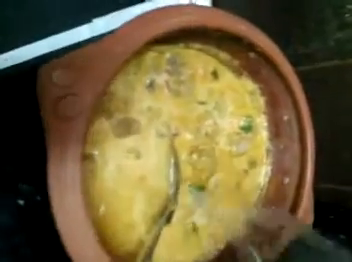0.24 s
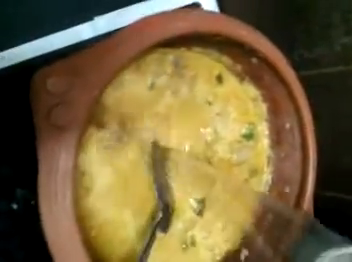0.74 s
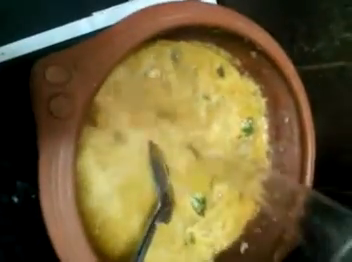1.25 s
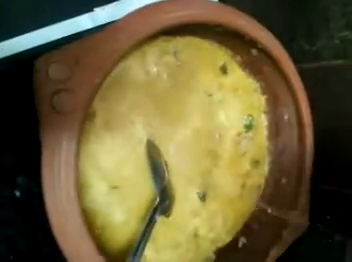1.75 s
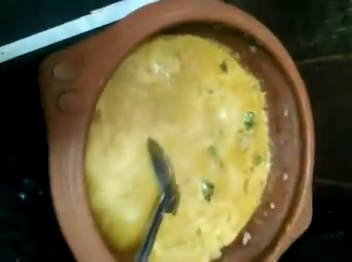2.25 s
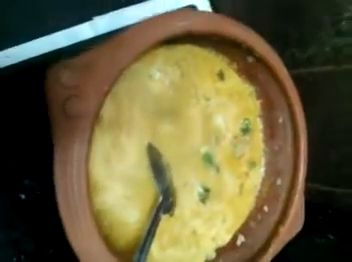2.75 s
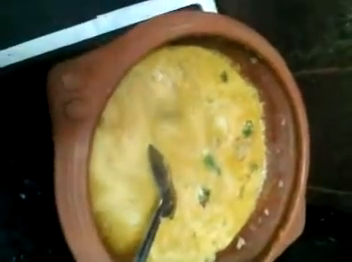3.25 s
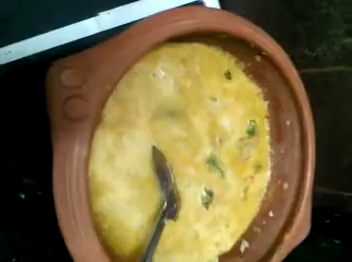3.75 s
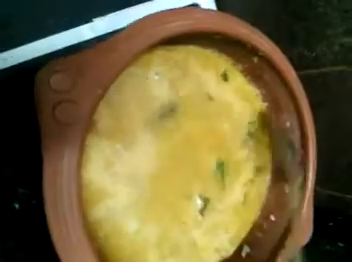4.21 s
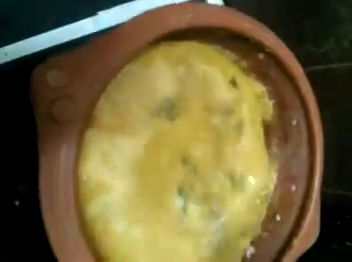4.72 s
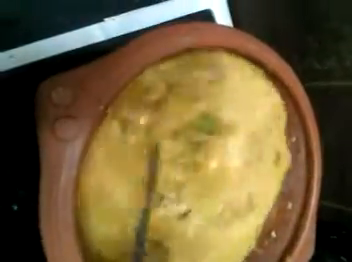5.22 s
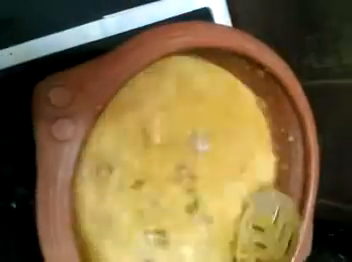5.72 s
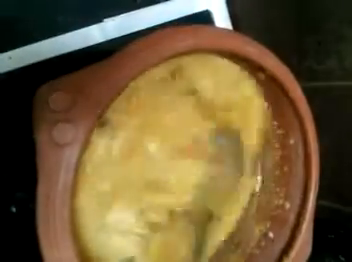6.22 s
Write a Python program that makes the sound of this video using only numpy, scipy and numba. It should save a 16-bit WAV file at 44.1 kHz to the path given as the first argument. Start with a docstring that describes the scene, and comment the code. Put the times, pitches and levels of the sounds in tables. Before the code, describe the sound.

Close crisp pouring with plinking drops fades to faint hiss, one sharp knock rings out, and gritty spoon strokes slosh round an earthenware pot.

```python
"""Pouring and stirring in a clay pot

Water is poured from a jug into a clay pot of curry, close to a phone: clouds of damped sines are the bubbles.
The jug is set down hard, ringing as a set of modes in a rattle of noise. Then a steel spoon scrapes round
the pot in grains of grit, and sauce slops and gurgles after it through wandering resonances. Decaying noise
gives the brief ring of a small hard kitchen; a stove hisses faintly, and metal ticks now and then."""
import sys
import numpy as np
from scipy import signal
from scipy.fft import rfft, irfft, next_fast_len
from scipy.io import wavfile
from scipy.ndimage import uniform_filter1d
from numba import njit

SR = 44100
rng = np.random.default_rng(int(sys.argv[2]) if len(sys.argv) > 2 else 0)


def wrap_up_sound(samples):
    """Save the sound to the file named by the first command line argument, as 16-bit audio."""
    columns = np.atleast_2d(samples).T
    # keep every value between -1 and 1, then stretch to whole-number steps
    tamed = np.clip(columns, -1, 1)
    steps = np.round(tamed * 32767).astype(np.int16)
    wavfile.write(sys.argv[1], SR, steps)


N = 285359
T = np.arange(N) / SR  # time in seconds

# The stream. Each row: time in seconds, spray level in dB, big bubbles in dB relative to the spray.
STREAM = [(0.485, -69, -18), (0.5, -49.5, -28), (0.56, -38, -14.5), (0.63, -47.5, -28), (0.7, -44.5, -25),
          (0.88, -45.5, -17), (1.05, -57, -22), (1.18, -57.5, -10.5), (1.22, -54, -32), (1.32, -57.5, -18),
          (1.37, -48, -23), (1.44, -51.5, -9.5), (1.56, -48, -20.5), (1.7, -58, -17), (1.81, -45, -21),
          (1.96, -56.5, -4.5), (2.05, -95, 0), (2.16, -61, -15), (2.4, -84, -7)]
# Spectrum of the poured water. Each row: frequency in Hz, gain in dB.
WATER_SPECTRUM = [(250, -43), (400, -57), (610, -21.5), (820, -16), (1190, -9), (2350, 3.5), (3020, -1.5),
                  (5270, 5.5), (7500, -10), (12000, 4)]
# Pitches the pot favours under the stream. Each row: frequency in Hz, width in Hz, level in dB re water.
STREAM_RESONANCES = [(540, 66, -18.5), (2075, 110, -17), (2630, 120, -18)]
MIDDLE_DB = -4  # middle-sized bubbles relative to the spray

# Spoon strokes. Each row: start in seconds, build-up in seconds, length in seconds, grit level in dB,
# gain in dB of each lower range over the one above, change of that gain in dB per second along the stroke.
SPOON_STROKES = [(4.49, 0.0053, 0.0088, -44.5, -7, 0.1), (4.555, 0.072, 0.37, -34, -5.5, 10.5),
                 (4.949, 0.0033, 0.088, -39, -2, 31), (5.079, 0.092, 0.22, -49.5, 1, 5),
                 (5.222, 0.14, 0.18, -46.5, 1, -7.5), (5.468, 0.2, 0.45, -60.5, -0.5, 1.5),
                 (5.87, 0.023, 0.55, -70, -10, 6), (6.168, 0.049, .17, -57, -0.5, 9),
                 (6.367, 0.063, 0.058, -56.5, -13, -10)]
SAG_DB_PER_S, RELEASE_DB_PER_S = 55.5, 314  # grit fades along a stroke, then the spoon lifts
# Spectrum of the scraping. Each row: frequency in Hz, gain in dB.
SCRAPE_SPECTRUM = [(100, -72), (400, -21), (610, -8), (925, -1.5), (1930, -5), (2450, -3), (5270, -5.5),
                   (7500, -21), (12000, -4.5)]
# Wall resonances under the spoon. Each row: frequency in Hz, width in Hz, level in dB.
WALL_RESONANCES = [(1400, 31, -2)]

# Sauce slopping in the hollow of the pot. Each row: time in seconds, relative level in dB.
SLOP_LEVEL = [(4.55, -69), (4.6, -50.5), (4.86, -53.5), (4.91, -62), (4.98, -52), (5.08, -52.5),
              (5.18, -84), (5.27, -55.5), (5.57, -66.5), (5.64, -61.5), (5.9, -69), (6.1, -94),
              (6.23, -72.5), (6.31, -88), (6.38, -66), (6.46, -91)]
# Air over the sauce. Each row: frequency in Hz, width in Hz, level in dB re slop,
# loss in dB per dB of hard slopping.
HOLLOW_AIR = [(238, 16, -7, .4), (326, 32, 5, .8), (545, 36, -7, -.7)]
# Gurgles as the sauce folds round the spoon. Each row: start in seconds, end in seconds,
# first frequency in Hz, last frequency in Hz, level in dB.
TRAPPED_AIR = [(4.6, 4.698, 1490, 1530, -42), (4.602, 4.78, 2550, 2470, -44),
               (4.721, 4.877, 820, 907, -47.5), (4.949, 5.16, 964, 954, -49),
               (4.973, 5.113, 1390, 1430, -48.5), (4.992, 5.076, 1790, 1790, -46),
               (5.111, 5.28, 1140, 1420, -52), (5.251, 5.398, 875, 950, -55.5),
               (5.319, 5.4, 1410, 1510, -54)]
GURGLE_WIDTH_HZ = 64

# Single splashes, drops and spoon touches. Each row: time in seconds, level in dB, bubble frequency in Hz,
# smack in dB relative to the bubble.
SINGLE_SPLASHES = [(0.499, -33, 4360, -8), (0.5172, -29.5, 3130, 14), (0.538, -28.5, 4300, 11),
                   (0.5635, -27.5, 2280, -14), (0.602, -29, 5400, -5), (0.6384, -26, 3830, 10),
                   (0.6923, -32, 2740, 17.5), (0.857, -27.5, 5130, 5), (0.874, -23.5, 3580, 3.5),
                   (1.2083, -30.5, 3570, -4), (1.235, -36, 2090, -11), (1.354, -27, 4320, -16),
                   (1.371, -28, 4700, 11.5), (1.537, -34, 3420, 12), (1.6318, -28, 2620, -2),
                   (1.697, -30, 5700, -9), (1.7792, -28, 4550, -9), (1.7974, -26, 3200, 12.5),
                   (1.9086, -28.5, 2580, -18), (1.94, -27, 5070, -21), (2.153, -45, 5170, -8),
                   (4.573, -28, 3740, 12.5), (4.68, -21, 2640, 16.5), (4.9532, -17.5, 3620, -5),
                   (5.356, -24, 4670, -19), (5.5657, -33, 2650, 16.5), (5.6689, -29.5, 4850, 1.5),
                   (5.732, -37.5, 1600, 12), (5.773, -32.5, 2460, 1), (5.7843, -30.5, 4600, -9),
                   (5.831, -38.5, 2660, 15.5), (6.2033, -32.5, 1690, 11), (6.224, -28.5, 2280, -8),
                   (6.238, -34, 1410, 3), (6.2697, -29, 1750, 4), (6.3, -35.5, 2010, 4),
                   (6.4215, -36, 2310, 0)]
# Deep glugs as air is dragged under. Each row: time in seconds, level in dB, frequency in Hz.
DEEP_GLUGS = [(0.549, -48, 760), (0.657, -43, 845), (0.689, -47.5, 822), (0.74, -54, 536),
              (0.885, -54, 524), (0.96, -58, 550), (1.15, -55, 790), (1.808, -52, 940), (1.826, -50, 890),
              (1.896, -39.5, 910), (1.94, -42, 816), (4.843, -34, 880), (4.866, -34.5, 887),
              (6.329, -45, 1000)]

# The jug meets the counter, its far edge follows, then it rocks once. Each row: time in seconds,
# level in dB, rattle in dB relative to that level, low-pass cutoff in Hz.
JUG_CONTACTS = [(3.3187, -5.5, -14, 9000), (3.3245, -18, -3, 9000), (3.4965, -29, -9, 4800)]
# Modes of the contact thud. Each row: frequency in Hz, level in dB, 60 dB decay time in seconds.
THUD_MODES = [(1004, -3, 0.014)]
# Modes of jug and counter. Each row: frequency in Hz, level in dB, 60 dB decay time in seconds.
JUG_MODES = [(428, -32, .3), (583, -36.5, .3), (902, -30.5, 0.2), (928, -20, .32), (1030, -31.5, 0.2),
             (1082, -28.5, .2), (1640, -28.5, 0.17), (2384, -28.5, 0.2), (2390, -28.5, 0.2),
             (2930, -29.5, .12), (4210, -21.5, .1), (5150, -23.5, .07), (6200, -25.5, .06)]
# Spectrum of the rattling counter top. Each row: frequency in Hz, gain in dB.
RATTLE_SPECTRUM = [(120, -79.5), (200, -37), (430, -14.5), (768, -22), (938, -1), (1140, -2.5), (1700, -7),
                   (2420, -5.5), (2900, -10), (3250, -20.5), (3700, -19.5), (4200, -10.5), (6440, -19.5),
                   (7740, -29.5), (10100, -70), (17000, -120)]
RATTLE_T60_S = 0.11
# Dull bumps as the jug settles. Each row: time in seconds, level in dB.
SETTLING_BUMPS = [(3.328, -50.5), (3.5, -53)]
BUMP_HZ, BUMP_T60_S = 264, 0.3
# The counter shakes the phone stand. One row: frequency in Hz, level in dB, 60 dB decay time in seconds.
STAND_SHUDDER = (120, -62.5, 0.97)

# Faint metal ticks. Each row: time in seconds, then the level in dB of each mode in turn.
METAL_TICKS = [(2.327, -91, -81, -65), (2.754, -50.5, -52.5, -66), (3.744, -52.5, -47.5, -74)]
# Modes of the metal part. Each row: frequency in Hz, 60 dB decay time in seconds.
METAL_MODES = [(4880, .035), (6650, .035), (9590, .045)]

# The swelling part of the stove hiss. Each row: time in seconds, level in dB.
STOVE_LEVEL = [(0, -66.5), (.2, -71), (2.3, -69), (2.65, -67), (3.25, -74), (3.68, -63), (3.85, -71.5),
               (4.15, -67.5), (4.4, -63), (4.6, -66), (6.47, -67)]
# Spectrum of the stove hiss. Each row: frequency in Hz, gain in dB.
HISS_SPECTRUM = [(15, -32), (25, -6.5), (183, -5.5), (233, -2), (1140, -10.5), (1880, -2.5), (2070, -5.5),
                 (2220, -0.5), (2960, -10), (4910, 0.5), (6860, -11), (7740, -23), (10100, -49),
                 (17000, -120)]
# Thin whistles of the stove. Each row: frequency in Hz, width in Hz, level in dB relative to the hiss.
STOVE_WHISTLES = [(92.2, 18, -19.5), (1510, 31, -17), (1760, 30, -17.5), (2340, 34, -15),
                  (5070, 147, -25.5), (9220, 87, -24.5)]
SIMMER_DB = -80  # small bubbles bursting in the hot sauce

ROOM_T60_S, ROOM_TREBLE_T60_S, ROOM_DB, ROOM_GAP_S = 0.45, 0.47, -3.5, 0.0015
KNOCK_ECHO_DELAY_S = 0.004  # delay of the knock's echoes, which keeps its attack crisp
SELF_NOISE_DB, TOP_HZ = -82, 11500  # phone hiss and upper cutoff
STEADY = 1  # pitch factor of a ring that does not glide


def pour():
    """Bubble resonance: a stream entrains air of every size, and fine spray sounds above the big bubbles."""
    spray_db, big_db = curves(STREAM)
    spray = cloud(count=40000, cycles=8., scatter_db=2.5, glide=1.1, lo_hz=400, hi_hz=12000)
    bubbles = cloud(count=4500, cycles=75., scatter_db=3.2, glide=1.08, lo_hz=450, hi_hz=7500)
    wobble = amp(1.5 * walk(45) + 1.2 * walk(15))
    water = unit(wobble * colour(spray + bubbles, WATER_SPECTRUM))
    pot_rings = 0
    for hz, width_hz, db in STREAM_RESONANCES:
        level = amp(db + 6.04 * walk(14))
        pot_rings = pot_rings + level * wavering(water, hz * (1 + 0.02 * walk(8.5)), width_hz)
    gains = [amp(0), amp(MIDDLE_DB), amp(big_db)]
    return amp(spray_db) * played(water + pot_rings, gains, [3300, 1700])


def stir():
    """Frictional excitation: grit under the spoon edge clicks into the clay wall; folding sauce bubbles."""
    grit = cloud(count=30000, cycles=5., scatter_db=2.5, glide=STEADY, lo_hz=170, hi_hz=12000)
    grit = grit * amp(1.5 * walk(40))
    wall = 0
    for hz, width_hz, db in WALL_RESONANCES:
        # the level wanders as the spoon moves along
        wall = wall + amp(db + 9.9 * walk(15)) * unit(resonance(grit, hz, width_hz))
    sauce = cloud(count=3500, cycles=60., scatter_db=3.5, glide=1.06, lo_hz=250, hi_hz=6500)
    mix = colour(unit(grit) + amp(-10.0) * unit(wall) + amp(-2.5) * sauce, SCRAPE_SPECTRUM)
    gains = [strokes(step) for step in range(3)] + [0]  # nothing from the lowest range
    return played(mix, gains, [3300, 1700, 600])


def strokes(step):
    """Stroke envelope: build-up, sag and lift-off of the pitch range that lies step ranges below the grit."""
    gain = 0
    for start, rise, length, db, tilt_db, tilt_change_db in SPOON_STROKES:
        u = np.clip(T - start, 0, length)
        sag_db = SAG_DB_PER_S * np.maximum(u - rise, 0)
        release_db = RELEASE_DB_PER_S * np.maximum(T - start - length, 0)
        range_db = step * (tilt_db + tilt_change_db * u)
        gain = gain + np.minimum(u / rise, 1) * amp(db - sag_db - release_db + range_db)
    return gain


def slop():
    """Cavity resonance: sauce slaps about low in the pot and rings the air above on wandering pitches."""
    slaps = cloud(count=1500, cycles=6., scatter_db=1.5, glide=1.1, lo_hz=230, hi_hz=750)
    db = curves(SLOP_LEVEL)[0]
    # hard slopping is broad and high; the low air rings clearest once the sauce calms
    hard_db = np.maximum(db + 62, 0)
    air = 0
    for hz, width_hz, air_db, loss in HOLLOW_AIR:
        level = amp(air_db - loss * hard_db + 3 * walk(14))
        air = air + level * wavering(slaps, hz * (1 + .03 * walk(9)), width_hz)
    return amp(db) * (slaps + air) / 2


def gurgles():
    """Trapped-air resonance: noise rings unevenly on a gliding pitch, swells in and fades out again."""
    out = np.zeros(N)
    for start, end, first_hz, last_hz, db in TRAPPED_AIR:
        i, j = int(start * SR), int(end * SR)
        noise = rng.standard_normal(j - i)
        tone = wavering(noise, np.linspace(first_hz, last_hz, j - i), GURGLE_WIDTH_HZ)
        out[i:j] += amp(db) * signal.windows.tukey(j - i, .4) * tone
    return out


def splashes(smack_t60=0.077, glug_t60=0.041, count=7):
    """Impact and bubble resonance: a smack of noise with a cluster of bubbles round one pitch; lone glugs."""
    s, db, hz, smack_db = np.transpose(SINGLE_SPLASHES)[:, :, None]
    # the first bubble of each cluster is on time
    late, pitch = rng.random((len(s), 2, count)).transpose(1, 0, 2) * (np.arange(count) > 0)
    spread = pitch - pitch.mean(axis=1, keepdims=True)
    pitch_hz = hz * np.exp(.5 * spread * (late > 0))
    bubble_db = db - 4 - 7 * (late > 0) - 6 * late  # the first bubble is the biggest
    out = ring(s + .014 * late, pitch_hz, 42 / pitch_hz, amp(bubble_db), 1.06)
    u = np.arange(int(.1 * SR)) / SR
    for start, f, level in zip(s[:, 0], hz[:, 0], amp(db + smack_db)[:, 0]):
        noise = rng.standard_normal(len(u))
        band = resonance(resonance(noise, f, 1.6 * f), f, 1.6 * f)
        smack = unit(band) * amp(-60 * u / smack_t60)
        i = int(start * SR)
        out[i:i + len(u)] += 0.056 * level * smack[:N - i]
    out = filtered(out, 3, 800, "highpass")  # small drops have no bass
    s, db, hz = np.transpose(DEEP_GLUGS)
    glugs = ring(s, hz, glug_t60, amp(db), 0.96)
    return out + filtered(glugs, 4, [450, 1100], "bandpass")  # they start softly


def knocks():
    """Modal impact: a hard contact excites jug and counter in a short rattle; the last, faintest is duller."""
    hz, mode_db, t60 = np.transpose(THUD_MODES + JUG_MODES)
    push = np.hanning(12)  # the contact lasts a quarter of a millisecond
    hit = 0
    for s, db, rattle_db, top_hz in JUG_CONTACTS:
        body = np.convolve(ring(s, hz, t60, amp(db + mode_db), STEADY), push / push.sum())[:N]
        rattle = puff(s, lambda x: colour(x, RATTLE_SPECTRUM), RATTLE_T60_S)
        hit = hit + filtered(body + amp(db + rattle_db) * rattle, 6, top_hz)
    hit = filtered(hit, 3, 400, "highpass")  # a small jug moves little low air
    dull = lambda x: resonance(resonance(x, BUMP_HZ, 200), BUMP_HZ, 200)
    return hit + sum(amp(db) * puff(s, dull, BUMP_T60_S) for s, db in SETTLING_BUMPS)


def boom():
    """Structure-borne sound: the counter shakes the phone stand in a faint low shudder after the knock."""
    hz, db, t60 = STAND_SHUDDER
    return amp(db) * puff(JUG_CONTACTS[0][0], lambda x: resonance(resonance(x, hz, hz), hz, hz), t60)


def ticks():
    """Modal ringing: high modes of a small metal part, touched softly."""
    table = np.array(METAL_TICKS)
    out = 0
    for k, (hz, t60) in enumerate(METAL_MODES):
        mode = ring(table[:, 0], hz, t60, amp(table[:, k + 1]), STEADY)
        out = out + resonance(mode, hz, 300)  # softens the onset
    return out


def stove():
    """Broadband flow noise: hiss, thin whistles and simmering bubbles; the middle swells and flickers."""
    hiss = unit(colour(rng.standard_normal(N), HISS_SPECTRUM))
    top, *gas, hum = split(hiss, [7800, 5600, 4000, 2800, 2000, 1300])
    gas = sum(amp(2 * walk(5)) * part for part in gas)  # each range flickers by itself
    thin = []
    for hz, width_hz, db in STOVE_WHISTLES:
        wander = .008 * walk(4) * (hz < 6000)  # the highest holds its pitch
        tone = wavering(rng.standard_normal(N), hz * (1 + wander), width_hz)
        thin.append(amp(db + 4.5 * walk(7)) * tone)
    simmer = cloud(count=1500, cycles=30., scatter_db=2., glide=1.1, lo_hz=1300, hi_hz=6000)
    simmer = simmer * amp(3 * walk(3))
    # hum below and hiss above the gas range do not swell
    steady = top + hum + thin[0] + thin[-1]
    swelling = amp(curves(STOVE_LEVEL)[0]) * (gas + sum(thin[1:-1]))
    return swelling + amp(-67.0) * steady + amp(SIMMER_DB) * simmer


def kitchen(x):
    """Reverberation: dense decaying echoes of hard walls after a short gap; treble lasts slightly longer."""
    u = np.arange(int(.8 * SR)) / SR
    noise = rng.standard_normal(len(u)) * (u > ROOM_GAP_S)
    low = filtered(noise, 1, 2500)
    tail = low * amp(-60 * u / ROOM_T60_S) + (noise - low) * amp(-60 * u / ROOM_TREBLE_T60_S)
    return amp(ROOM_DB) * signal.fftconvolve(x, tail / np.sqrt(np.sum(tail ** 2)))[:N]


def amp(db):
    """Decibel law: amplitude factor of a level."""
    return 10 ** (np.asarray(db) / 20)


def unit(x):
    """Normalisation to an rms of one."""
    return x / np.sqrt(np.mean(x ** 2))


def filtered(x, order, hz, kind="lowpass"):
    """Butterworth filtering: a maximally flat pass band."""
    return signal.sosfilt(signal.butter(order, hz, kind, fs=SR, output="sos"), x)


def colour(x, points):
    """Spectral shaping: gain follows (Hz, dB) points, joined along log frequency."""
    hz, db = np.transpose(points)
    size = next_fast_len(N + 8192)
    f = np.log(np.arange(size // 2 + 1) * SR / size + 1)
    return irfft(rfft(x, size) * amp(np.interp(f, np.log(hz), db)), size)[:N]


def resonance(x, hz, width_hz):
    """Simple resonance: a two-pole peak of the given width."""
    return signal.lfilter(*signal.iirpeak(hz, hz / width_hz, SR), x)


def wavering(x, hz, width_hz):
    """Heterodyne resonance: its centre follows hz sample by sample."""
    turn = np.exp(2j * np.pi * np.cumsum(hz) / SR)
    k = np.exp(-np.pi * width_hz / SR)
    return unit((signal.lfilter([1 - k], [1, -k], x / turn) * turn).real)


def curves(table):
    """Interpolation of a table's columns; the first is silent outside, but held if it reaches the end."""
    s, db, *rest = np.transpose(table)
    last_db = db[-1] if s[-1] > T[-1] - .05 else -150
    return [np.interp(T, s, db, -150, last_db)] + [np.interp(T, s, c) for c in rest]


def walk(rate):
    """Random modulation: levels held 1 / rate s and slewed twice, with an rms of one."""
    k = int(SR / rate)
    held = np.repeat(rng.standard_normal(N // k + 1), k)
    return unit(uniform_filter1d(uniform_filter1d(held, k), k)[:N])


@njit
def rings(n, s, hz, t60, size, glide, sr):
    """Damped oscillation: decaying sines whose pitch changes by the factor glide over t60."""
    out = np.zeros(n)
    for k in range(len(s)):
        i, m = int(s[k] * sr), int(t60[k] * sr) + 1
        z = size[k] + 0j
        p = np.exp(2j * np.pi * hz[k] / sr - np.log(1000) / m)
        q = np.exp(2j * np.pi * hz[k] / sr * (glide[k] - 1) / m)
        for j in range(max(i, 0), min(i + m, n)):
            out[j] += z.imag
            z *= p
            p *= q
    return out


def ring(s, hz, t60, size, glide):
    """Superposition of damped sines, with single values shared by all."""
    return rings(N, *(1. * a.ravel() for a in np.broadcast_arrays(s, hz, t60, size, glide)), 1. * SR)


def cloud(count, cycles, scatter_db, glide, lo_hz, hi_hz):
    """Random superposition: grains at random times and pitches, some bigger; flat per Hz on average."""
    when, pitch, big, last = rng.random((count, 4)).T
    hz = lo_hz * (hi_hz / lo_hz) ** pitch
    t60 = cycles * (.5 + last) / hz
    size = hz * amp(-scatter_db * np.log(big + 1 / 50))
    return unit(ring(when * N / SR, hz, t60, size, glide))


def split(x, edges_hz, steep=16.):
    """Complementary filtering: pitch ranges from the top down that add up to the whole."""
    size = next_fast_len(N)
    f = np.log(np.arange(size // 2 + 1) * SR / size + 1)
    below = [1] + [1 / (1 + np.exp(steep * (f - np.log(hz)))) for hz in edges_hz] + [0]
    whole = rfft(x, size)
    return [irfft(whole * (a - b), size)[:N] for a, b in zip(below, below[1:])]


def played(x, gains, edges_hz):
    """Band-wise modulation: each pitch range of a steady texture follows its own gain."""
    return sum(gain * unit(part) for gain, part in zip(gains, split(x, edges_hz)))


def puff(s, colour_of, t60, rise_s=0.0014):
    """Exponential decay: coloured noise swells from s on and dies away."""
    u = np.maximum(T - s, 0)
    return unit(colour_of(rng.standard_normal(N))) * np.minimum(u / rise_s, 1) * amp(-60 * u / t60)


def scene():
    """Superposition of direct sound and echoes, with the bass and treble losses of a small microphone."""
    near = pour() + stir() + slop() + gurgles() + splashes()
    hit, tick = knocks(), ticks()
    # the knock's echoes are held back and weakened so its attack stays crisp
    late_hit = amp(-4.5) * np.roll(hit, int(KNOCK_ECHO_DELAY_S * SR))
    sound = near + hit + kitchen(near + late_hit + tick)
    # the small microphone takes little bass and its port fades out near the top
    sound = filtered(sound, 4, 255, "highpass")
    dull = filtered(sound, 12, 7500)
    return (dull + amp(-32.0) * sound + tick + boom() + stove())[None]


def record(dry):
    """Self-noise and band limit: the phone adds its own faint hiss and cuts the top."""
    noisy = dry + amp(SELF_NOISE_DB) * rng.standard_normal(N)
    return signal.sosfilt(signal.ellip(10, .2, 60, TOP_HZ, fs=SR, output="sos"), noisy)


dry = scene()
out = record(dry)
wrap_up_sound(out)
```